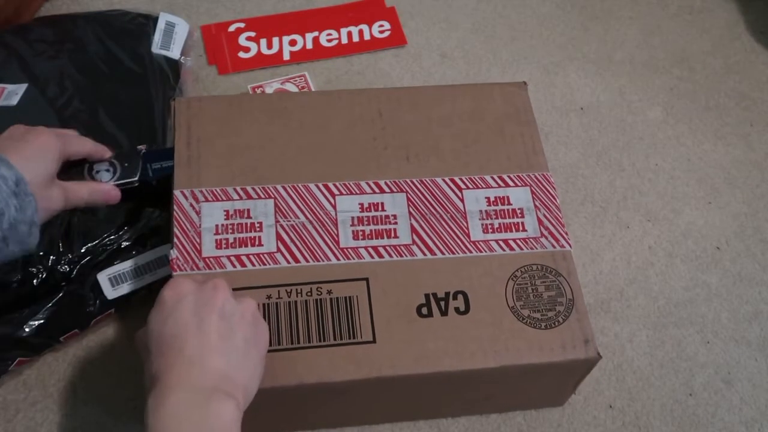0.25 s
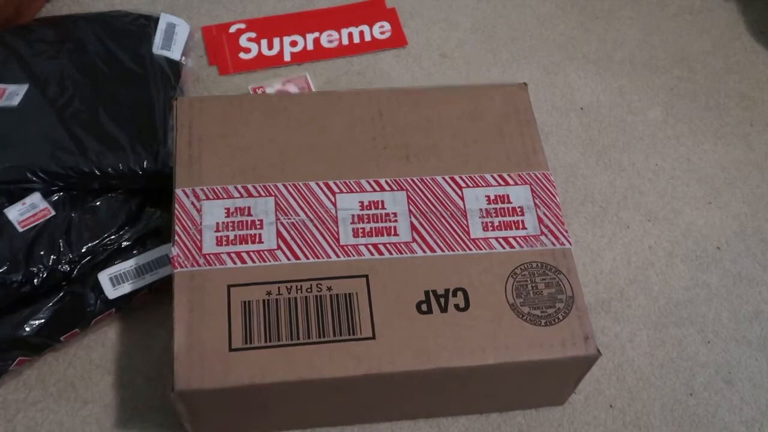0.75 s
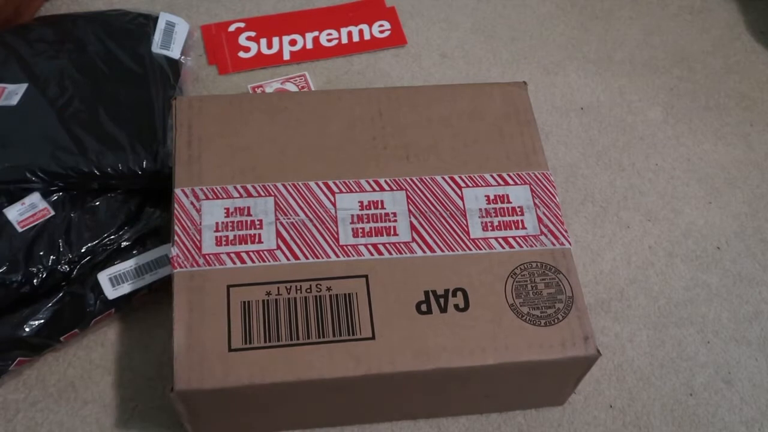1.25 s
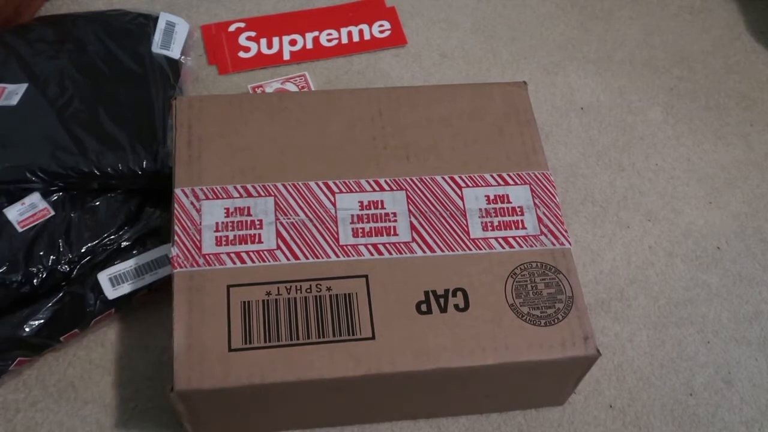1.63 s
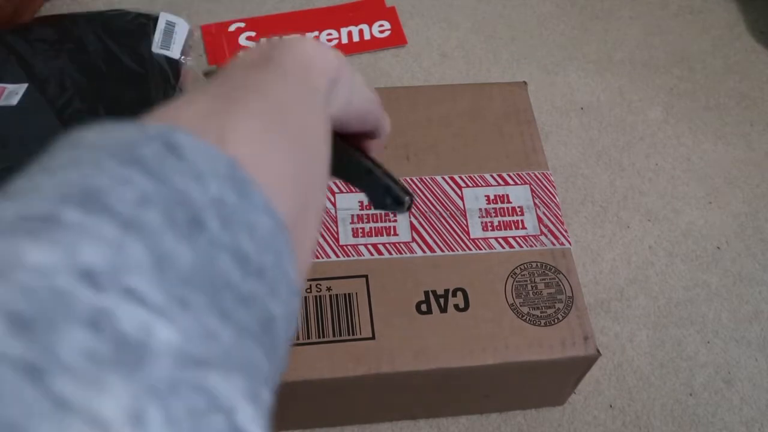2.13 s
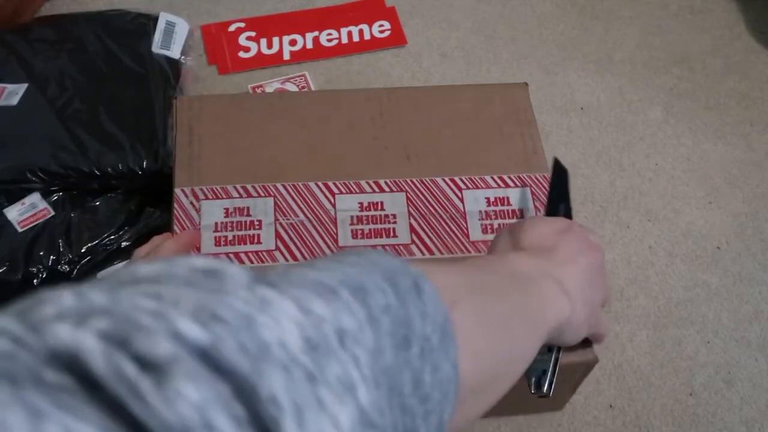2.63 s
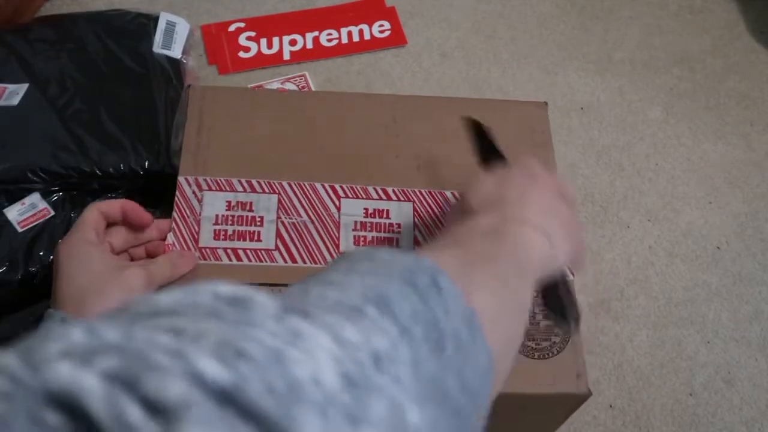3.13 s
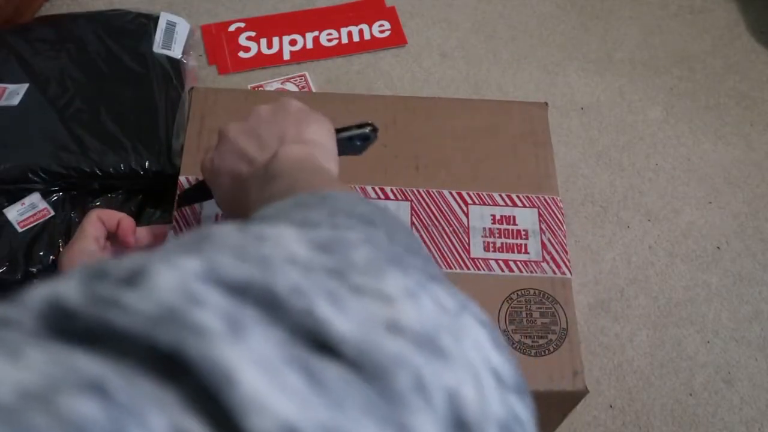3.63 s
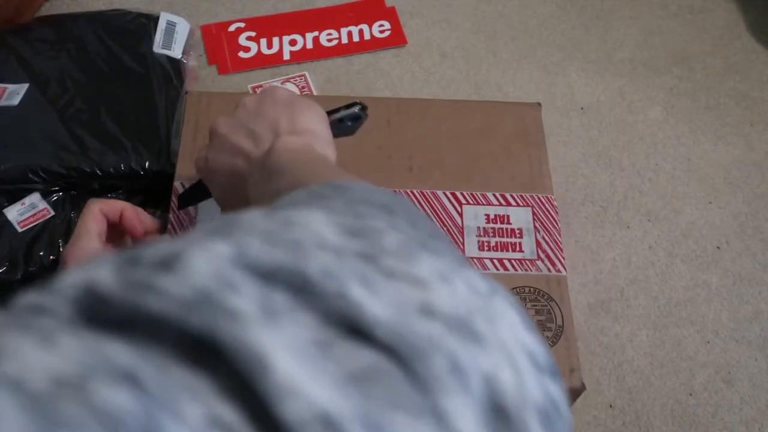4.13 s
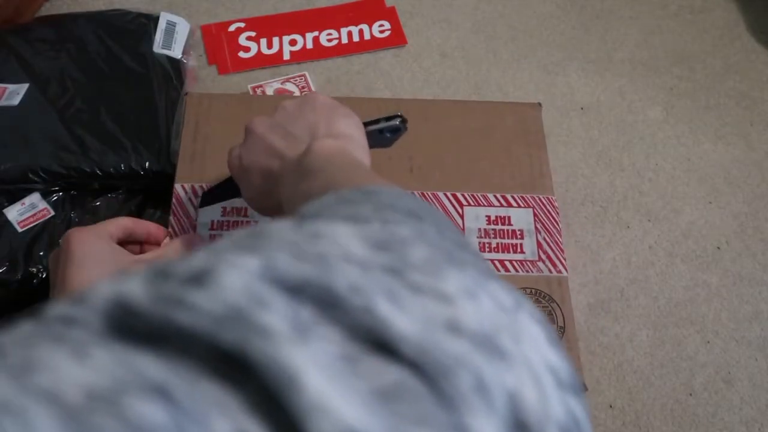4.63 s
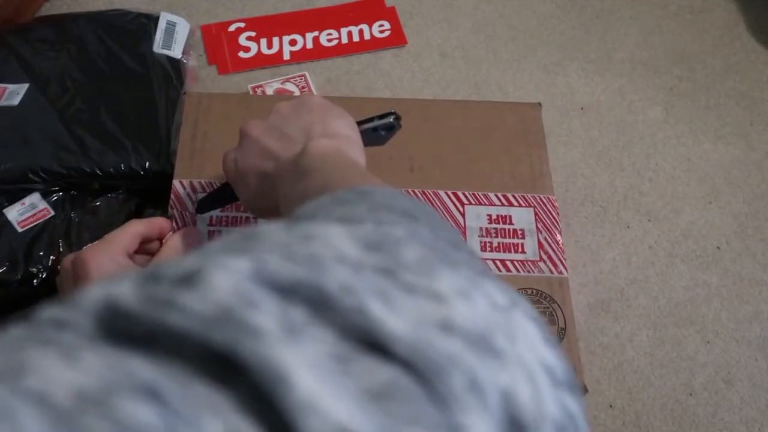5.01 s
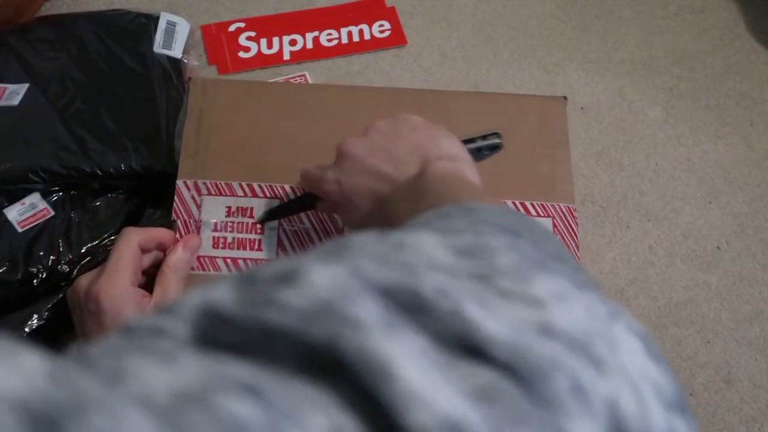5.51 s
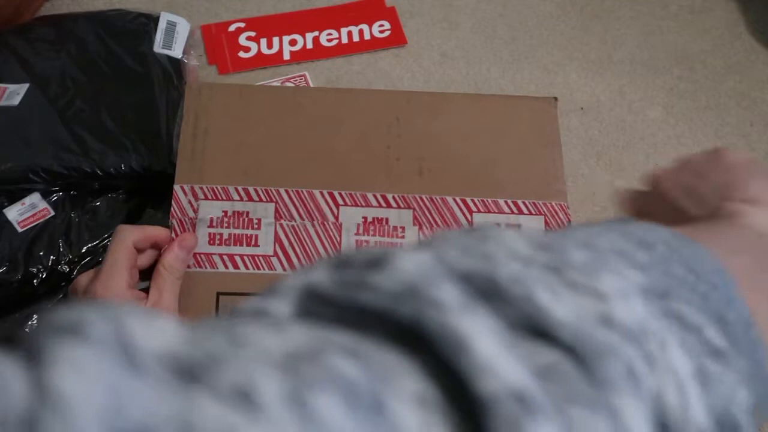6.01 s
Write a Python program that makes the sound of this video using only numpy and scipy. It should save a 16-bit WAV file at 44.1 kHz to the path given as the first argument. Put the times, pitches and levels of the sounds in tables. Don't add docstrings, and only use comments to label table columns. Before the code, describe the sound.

A dry scrape and a faint steely slide open the scene at a taped cardboard box, ending in a hollow knock. A quiet second holds only rumble, hiss and a tiny lock tick. Cloth brushes past, the blade rubs and taps, then stabs with loud boxy knocks. Small rasps follow before a long crackling cut with a sharp final clack. Close stereo microphones, small carpeted room.

```python
import sys
import numpy as np
from scipy import signal
from scipy.fft import rfft, irfft, next_fast_len
from scipy.io import wavfile
from scipy.ndimage import uniform_filter1d, map_coordinates

SR = 44100
rng = np.random.default_rng(int(sys.argv[2]) if len(sys.argv) > 2 else 0)


def output_pcm(signal):
    pcm = np.clip(np.atleast_2d(signal).T, -1, 1) * 32767
    wavfile.write(sys.argv[1], SR, np.round(pcm).astype(np.int16))


def decibels_to_gain(level_db):
    exponent = np.asarray(level_db, float) / 20
    return 10 ** exponent


N = 275933


def unit(x):
    return x / np.sqrt(np.mean(x ** 2) + 1e-20)


def noise():
    return rng.standard_normal(N)


def along(points, hz):
    f, v = np.transpose(points)
    return np.interp(np.log(hz + 1), np.log(f + 1), v)


def wobble(rate):
    knots = rng.standard_normal(int(N * rate / SR) + 4)
    return map_coordinates(knots, [np.arange(N) * rate / SR])


def held(rows, attack_s, release_s):
    edge_db = 18.5
    t, power = np.arange(N) / SR, 0
    for start, hold, *db in rows:
        knots = np.cumsum([start - 3 * attack_s, 3 * attack_s, abs(hold), 3 * release_s])
        shape = decibels_to_gain(2 * np.interp(t, knots, [-3 * edge_db, 0, 0, -3 * edge_db], -99, -99))
        power = power + decibels_to_gain(2 * np.array(db))[:, None] * shape
    return np.sqrt(power)


def filtered(x, response):
    m = next_fast_len(N + SR // 2)
    return irfft(rfft(x, m) * response(np.fft.rfftfreq(m, 1 / SR)), m)[..., :N]


def colour(table):
    return lambda f: decibels_to_gain(along(table, f))


def modes(table):
    def response(f):
        total = 0
        for k, (centre, width, db) in enumerate(table):
            damping = 1j * f * width
            total = total + (-1) ** k * decibels_to_gain(db) * damping / (centre * centre - f * f + damping)
        return total
    return response


def body(table, top_hz):
    return lambda f: modes(table)(f) / (1 + 1j * f / top_hz) ** 2


def grit(rate, spread_db, share):
    slips = rng.random(N) < rate / SR
    push = np.clip(noise(), -2, 2)
    size = decibels_to_gain(spread_db * np.clip(noise(), -3, 1.5))
    return np.sqrt(1 - share) * unit(slips * push * size) + np.sqrt(share) * noise()


def random_patches(shape, frames):
    field = uniform_filter1d(rng.standard_normal(shape), size=3, axis=0)
    return unit(uniform_filter1d(field, size=frames, axis=1))


def patchy(x, depth_db):
    z = signal.stft(x, nperseg=256)[2]
    return signal.istft(z * decibels_to_gain(depth_db * random_patches(z.shape, 7)), nperseg=256)[1][:N]


def shifting(x):
    z = signal.stft(x, nperseg=128)[2]
    return signal.istft(z * random_patches(z.shape, 5), nperseg=128)[1][:N]


# (time [s], level [dB])
RUMBLE_LEVEL = [(0.0, -50.5), (0.5, -47.5), (1.34, -49.5), (1.95, -46.5), (2.42, -41), (2.79, -44.5),
                (3.05, -39), (4.02, -42), (4.3, -44.5), (5.56, -45.5), (5.82, -36.5), (5.92, -37),
                (6.1, -46), (6.26, -51)]
# (frequency [Hz], level per Hz [dB])
RUMBLE = [(12, -60), (45, -29.5), (80, 3.5), (113, 0.5), (180, -16), (221, -17.5), (262, -49), (300, -39),
          (390, -55), (660, -120)]


def floor_rumble():
    time, db = np.transpose(RUMBLE_LEVEL)
    level = decibels_to_gain(np.interp(np.arange(N) / SR, time, db, -140, -140))
    lumps = decibels_to_gain(2.6 * wobble(14) + 2.6 * wobble(46))
    rumble = level * decibels_to_gain(1.0) * unit(lumps * filtered(noise(), colour(RUMBLE)))
    building = decibels_to_gain(-54.5) * unit(filtered(noise(), body([(49.4, 24, 0)], 110)))
    low = rumble + building
    stray = decibels_to_gain(-39) * np.roll(low, SR // 7) * [[1], [-1]]
    return low + stray


# (start [s], hold [s], level [dB])
HUM_LEVEL = [
    (.95, 0.85, -62.5),
    (2.5, 0.36, -56.5),
]
# (frequency [Hz], width [Hz], level [dB])
HUM = [(338, 5.3, 0)]


def far_hum():
    return held(HUM_LEVEL, 0.076, 0.4)[0] * decibels_to_gain(-0.5) * unit(filtered(noise(), modes(HUM)))


# (frequency [Hz], level per Hz [dB])
HISS = [(71, -76), (120, -9), (133, -1), (236, -4.5), (341, 1.5), (370, -4), (656, -9), (856, -10),
        (930, -10.5), (2380, -16), (7350, -26.5), (13100, -32.5), (13250, -50)]
# (frequency [Hz], correlation [-1 to 1])
ALIKE = [(60, 0.82), (180, 0.74), (550, -0.067), (1650, -0.26), (4970, -0.14), (15000, -0.33)]


def microphone_hiss():
    def spread(hz):
        angle = np.arccos(np.clip(along(ALIKE, hz), -1, 1)) / 2
        return colour(HISS)(hz) * [np.cos(angle), np.sin(angle)]
    mid, side = filtered(rng.standard_normal((2, N)), spread)
    return decibels_to_gain(-55) * np.array([mid + side, mid - side]) / np.std(mid)


def electronic_whine():
    whine_hz, beat_hz, whine_db = 13017, 23.976, -79
    t = np.arange(N) / SR
    pulse = 1 + 0.4 * np.cos(2 * np.pi * beat_hz * (t - .995))
    return decibels_to_gain(whine_db + 1.5 * wobble(8)) * pulse * np.sin(2 * np.pi * whine_hz * t)


# (frequency [Hz], 60 dB decay [s])
ROOM = [(150, 0.13), (1000, 0.12), (4000, 0.16), (12000, 0.17), (14500, .06)]


def echo(x, stretch):
    hz, t, z = signal.stft(rng.standard_normal(SR // 2), SR, nperseg=128)
    decay = decibels_to_gain(-60 * t / (stretch * along(ROOM, hz)[:, None]))
    tail = signal.istft(z * decay, SR, nperseg=128)[1]
    return signal.fftconvolve(x, tail / np.linalg.norm(tail))[:N]


# (start [s], hold [s], level [dB])
SLEEVE = [
    (1.95, 0.09, -62),
    (2.122, 0.013, -60.5),
]
# (frequency [Hz], width [Hz], level [dB])
WEAVE = [(1380, 140, 7), (1590, 260, 2), (1010, 300, 1)]


def sleeve():
    rub = patchy(filtered(noise(), modes(WEAVE)), depth_db=1.5)
    return held(SLEEVE, 0.089, 0.042)[0] * decibels_to_gain(5.0) * unit(decibels_to_gain(2.5 * wobble(39.4)) * rub)


# (start [s], hold [s], level [dB])
CUFF = [
    (3.2, 0.16, -59.5),
    (4.7, 0.067, -67),
    (5.09, 0.033, -67),
]
# (frequency [Hz], width [Hz], level [dB])
NAP = [(2230, 400, 7), (1000, 610, 6)]


def cuff():
    drag = filtered(grit(680, 1.4, 0.45), body(NAP, 5000))
    return held(CUFF, 0.038, 0.043)[0] * unit(patchy(drag, depth_db=2.5))


# (time [s], first pitch [Hz], last pitch [Hz], length [s], level [dB])
CHIRP = (1.588, 2500, 1400, .013, -44)


def lock_tick():
    start, high_hz, low_hz, length, db = CHIRP
    progress = np.clip((np.arange(N) / SR - start) / length, 0, 1)
    pitch = high_hz * (low_hz / high_hz) ** progress
    return decibels_to_gain(db) * np.sin(np.pi * progress ** .6) * np.sin(2 * np.pi * np.cumsum(pitch) / SR)


def damped_tones(rows):
    out, t = np.zeros(N + SR), np.arange(SR // 8) / SR
    for s, hz, db, t60 in rows:
        drift = 0.035 * (hz / 1000) * np.cumsum(rng.standard_normal(len(t)))
        swell = 1 - np.exp(-t * hz / 0.62)
        tone = np.sin(2 * np.pi * hz * t + drift)
        out[round(s * SR):][:len(t)] += decibels_to_gain(db - 60 * t / t60) * swell * tone
    return out[:N]


# (time [s], pitch [Hz], level [dB], 60 dB decay [s])
BOOMS = [(0.7875, 138, -13.5, 0.077), (2.299, 193, -30, 0.067), (3.929, 151, -7.5, 0.085),
         (4.0008, 167, -9, 0.048), (4.042, 150, -14, 0.063), (5.542, 174, -26.5, 0.06),
         (5.584, 145, -28, 0.052), (5.621, 160, -35, .06), (5.665, 163, -10.5, 0.16),
         (5.707, 175, -21, 0.056), (5.791, 160, -36, 0.048), (5.886, 164, -14, 0.092),
         (5.944, 174, -19, 0.074), (5.996, 170, -17, 0.061), (5.296, 165, -24.5, 0.063),
         (5.365, 164, -25.5, 0.068), (4.806, 120, -38, .07), (4.98, 151, -34, 0.11)]


def booms():
    return damped_tones(BOOMS)


# (time [s], pitch [Hz], level [dB], 60 dB decay [s])
RINGS = [(.517, 490, -37.5, .05), (0.572, 1300, -32, 0.041), (.576, 503, -29.5, 0.062),
         (.77, 501, -21, .05), (.777, 587, -19, 0.035), (.779, 888, -22, 0.045), (.778, 1630, -26, 0.022),
         (.778, 2040, -27, 0.032), (.778, 2300, -33, .03), (1.59, 2440, -55, 0.12), (1.594, 900, -48, 0.02),
         (.781, 366, -25, .045), (.779, 3505, -42, .05), (2.3, 3200, -42, .03), (2.299, 1700, -38, .03),
         (5.612, 1100, -30, .04), (5.763, 2620, -35, .09), (2.3, 710, -25, 0.029),
         (2.891, 1250, -23.5, 0.019), (3.068, 3770, -35.5, .025), (3.083, 502, -19, 0.06),
         (3.606, 510, -24.5, 0.021), (3.738, 840, -42, 0.035), (3.929, 1145, -20, 0.071),
         (3.9283, 546, -10.5, 0.066), (3.984, 658, -16, 0.034), (3.989, 710, -10.5, 0.019),
         (3.994, 890, -22, 0.038), (4.038, 2030, -15, 0.013), (4.039, 558, -0.5, 0.02),
         (4.064, 520, -16, 0.05), (4.151, 6000, -42, .03), (4.29, 885, -42.5, 0.057),
         (4.381, 260, -7.5, 0.015), (4.366, 1000, -41, .02), (4.381, 940, -26, 0.025),
         (4.385, 1300, -40, .025), (4.577, 1050, -25, 0.028), (4.589, 1460, -33.5, .04),
         (2.968, 900, -35, 0.018), (5.581, 610, -27, .025), (5.669, 1400, -28, 0.048),
         (5.837, 570, -33, 0.032), (6.0, 495, -29, 0.071), (5.968, 500, -24, .06),
         (6.036, 520, -12.5, 0.048), (5.72, 490, -23.5, 0.075), (5.886, 480, -18.5, 0.035),
         (4.489, 517, -25, 0.061), (4.577, 498, -12.5, 0.05), (4.579, 543, -21, 0.05),
         (4.886, 910, -36.5, 0.02), (6.039, 2750, -10.5, 0.026), (6.06, 2280, -21, 0.034),
         (6.042, 4040, -17, 0.044)]


def rings():
    return damped_tones(RINGS)


# (time [s], level [dB], pitch [Hz])
TICKS = [(0.5562, -38, 7330), (0.5738, -19, 6450), (0.577, -30, 7340), (1.222, -41, 4280), (2.3, -27, 1620),
         (1.485, -31.5, 11000), (2.8898, -23, 4560), (2.8938, -18.5, 6300), (3.922, -30, 6000),
         (3.9268, -14, 4000), (3.927, -12, 10000), (3.931, -15, 6200), (3.9307, -16, 9800),
         (3.935, -12, 11500), (3.935, -6.5, 2800), (3.9378, -10, 5800), (3.939, -16, 13000),
         (4.0383, -11, 3740), (4.0388, -14, 12000), (4.0394, -11, 1300), (4.071, -23, 1200),
         (4.127, -29.5, 905), (.594, -32, 6800), (4.3949, -48, 3010), (4.4623, -39, 5100),
         (4.486, -29, 7000), (4.8653, -34.5, 6200), (5.3091, -23, 3000), (5.35, -22, 3040),
         (5.353, -17, 9000), (5.4535, -50, 4480), (5.5977, -36, 6540), (5.602, -25, 10600),
         (5.62, -17, 9500), (5.669, -22, 2200), (5.7037, -18, 3000), (5.7635, -22, 5820),
         (5.581, -26, 1800), (5.724, -32, 3000), (5.846, -26, 4500), (5.8863, -32, 1500),
         (5.8342, -12, 4040), (5.856, -19, 5210), (5.9771, -14.5, 3360), (6.0043, -21, 3990),
         (6.037, -8.5, 9000), (6.039, -17, 760), (6.066, -21, 700), (.7805, -18, 290), (4.052, -24, 3300),
         (4.066, -27, 2500), (5.684, -27, 1500), (5.797, -28, 950), (5.839, -22, 2400)]


def short_ticks():
    out, t = np.zeros(N + SR), np.arange(SR // 100) / SR
    for s, db, hz in TICKS:
        decay = decibels_to_gain(db + 4.0 - 60 * t * hz / 6)
        out[round(s * SR):][:len(t)] += decay * (1 - np.exp(-t * hz / 0.48)) * np.sin(2 * np.pi * hz * t)
    return out[:N]


# (frequency [Hz], width [Hz], level [dB])
DRUM = [(166.5, 60.5, -3.5), (105, 103, -7), (236, 214, -15)]


def cavity(top_hz):
    return lambda f: body(DRUM, top_hz)(f) * (1j * f / (70 + 1j * f)) ** 2


# (frequency [Hz], width [Hz], level [dB])
PANEL = [(388, 39, -0.5), (484, 62, 1), (584, 40, -1.5), (762, 167, -20.5), (850, 28, -34)]


def flap(f):
    return body(PANEL + [(600, 500, -14)], 1400)(f) * (1j * f / (330 + 1j * f)) ** 2


# (frequency [Hz], width [Hz], level [dB])
BOARD = [(1298, 266, 2.5), (1324, 650, -3.5), (2160, 435, -4), (2750, 200, -12), (3306, 150, -9),
         (4040, 1300, -17.5), (5300, 130, -41)]


def board(f):
    return body(BOARD + [(1800, 2500, -12)], 4500)(f)


def contacts(rows, rise, flap_db, snap_db):
    force, t = np.zeros((4, N + SR)), np.arange(SR // 6) / SR
    decay_share = np.array([[.4], [.8], [1.5], [1.6]])
    for s, db, weight_db, length in rows:
        panel_db = flap_db + 0.38 * weight_db
        length = np.clip(length, .002, .12)
        burst = rng.standard_normal((4, len(t)))
        jolts = rng.standard_normal(len(t) // 40 + 1).repeat(40)[:len(t)]
        burst[2:] *= decibels_to_gain(2.6 * jolts)
        burst[0] = np.cos(2 * np.pi * 150 * t)
        burst *= decibels_to_gain(-60 * t / (length * decay_share)) * (1 - np.exp(-t / (rise * length)))
        burst /= np.linalg.norm(burst, axis=1)[:, None]
        levels = db + np.array([[weight_db], [panel_db], [0], [snap_db]])
        force[:, round(s * SR):][:, :len(t)] += decibels_to_gain(levels) * burst
    air = decibels_to_gain(33.0) * filtered(force[0, :N], cavity(506))
    flaps = decibels_to_gain(49.5) * filtered(force[1, :N], flap)
    knock = decibels_to_gain(29.0) * filtered(force[2, :N], board)
    tape = body([(5020, 11500, 2.5), (9580, 15800, -4.0)], 16000)
    snap = decibels_to_gain(26.0) * filtered(force[3, :N], tape)
    return air + flaps + knock + snap


# (time [s], knock level [dB], weight [dB], contact time [s])
CATCHES = [(4.93, -46, -3, 0.037), (4.975, -49, 14.5, 0.019), (5.01, -55, 1, 0.018), (5.08, -47, 5, 0.016),
           (5.15, -47, 8, 0.022), (5.21, -53, 3, 0.015), (5.645, -41, 2, .015), (5.72, -37, 14, 0.023),
           (5.745, -50, -2, .015), (5.81, -38, -1, 0.016), (5.91, -40, 6, 0.017), (5.95, -39.5, 9, 0.018),
           (6.058, -19.5, -10.5, 0.025), (6.072, -22.5, -6, 0.023), (6.085, -30, -6, 0.011)]


def catches():
    return contacts(CATCHES, rise=0.098, flap_db=0, snap_db=-12)


# (time [s], knock level [dB], weight [dB], contact time [s])
SCUFFS = [(.1054, -33, -38, 0.022), (.7672, -25, -4, 0.02), (2.2746, -42, 1, 0.045),
          (2.593, -48, 15, 0.026), (2.6299, -54, 21, 0.022), (2.8839, -23, -7.5, 0.058),
          (2.9641, -42, 7, 0.021), (3.0907, -27, -6, 0.029), (3.9888, -16.5, -12, 0.028),
          (4.0607, -31, 1, 0.046), (4.1137, -37, -8, 0.0082), (4.1444, -30.5, -8, 0.051),
          (5.0514, -49, 8, 0.047), (5.3293, -35, 8.5, 0.15), (5.3738, -53.5, 12, 0.04),
          (5.5425, -40.5, 9, .071), (5.5813, -36, 12, 0.05), (5.6178, -29.5, 3.5, 0.015),
          (5.7299, -42, 22, 0.064), (5.918, -32, 6.5, 0.04)]


def scuffs():
    return contacts(SCUFFS, rise=0.27, flap_db=-3.5, snap_db=-20.5)


# (time [s], knock level [dB], weight [dB], contact time [s])
KNOCKS = [(.7775, -21, -5, 0.011), (.7855, -31, 20, 0.0048), (2.2985, -37.5, 14.5, 0.038),
          (2.7557, -26, -32, 0.049), (3.6054, -48, 20, 0.041), (4.002, -31, 18, 0.0053),
          (4.0386, -8, -1, 0.019), (4.3815, -50, 35, .012), (4.575, -22, -4, 0.019),
          (4.8854, -50, 14, 0.015), (5.666, -18.5, -1.5, 0.066), (6.0385, -4, -21.5, 0.057)]


def knocks():
    return contacts(KNOCKS, rise=0.034, flap_db=-7, snap_db=-18)


# (time [s], knock level [dB], weight [dB], contact time [s])
RASPS = [(.512, -33.5, -15, 0.075), (.5854, -44, -10, 0.0079), (2.4539, -44, -7, 0.037),
         (2.8443, -40.5, 1, 0.14), (3.075, -28, -7.5, 0.066), (4.1774, -46, 16.5, 0.012),
         (4.2894, -48, 8.5, 0.031), (4.5288, -38, 0, 0.12), (4.7841, -44.5, -10, 0.017),
         (5.1176, -48.5, 4, 0.044), (5.4488, -44.5, -33, 0.036), (5.7888, -33, 15.5, .031),
         (6.0023, -24.5, -9, 0.049), (6.0194, -15, -19, 0.067), (6.0398, -32, -13, 0.062),
         (3.822, -46, -25, .04)]


def rasps():
    return contacts(RASPS, rise=0.42, flap_db=-0.58, snap_db=-6)


# (time [s], knock level [dB], weight [dB], contact time [s])
STABS = [(.5696, -34, 0.5, 0.018), (1.481, -46, -2, 0.11), (3.9265, -18.5, 2, 0.012),
         (3.9352, -16, -7, 0.11), (4.4869, -39, 7, 0.011), (5.3083, -28, -8, 0.018),
         (5.3497, -29.5, -7, 0.092), (5.5977, -27.5, -25, 0.051), (5.7044, -35, 15, 0.044),
         (5.7643, -31.5, -12, 0.089), (5.834, -20.5, -22, 0.036), (5.8557, -33, -25, 0.043),
         (5.886, -36.5, 22, 0.049), (5.9753, -27, -5, 0.042)]


def stabs():
    return contacts(STABS, rise=0.0052, flap_db=-2.3, snap_db=-4.5)


# (start [s], hold [s], level [dB])
SLIDE = [
    (.055, 0.043, -49),
    (.29, 0.07, -45),
    (.37, 0.078, -42),
]
# (frequency [Hz], width [Hz], level [dB])
STEEL = [(2100, 1800, -1), (4000, 2100, -0.5), (6600, 600, 8.5), (7550, 550, 8), (9000, 1300, 3),
         (12500, 7900, -4.5)]


def blade_whistle():
    steel = patchy(filtered(noise(), modes(STEEL)), depth_db=2.0)
    return held(SLIDE, 0.04, 0.028)[0] * decibels_to_gain(-5.0) * unit(steel)


# (start [s], hold [s], pressure [dB], edge bite over it [dB])
STROKES = [(0.0, .1, -45, 0), (0.187, 0.073, -48, -12), (0.301, 0.16, -41.5, -1.5),
           (0.547, 0.038, -43.5, -4.5), (2.003, 0.47, -51.5, -14.5), (2.414, 0.074, -45.5, -10),
           (2.608, 0.19, -47.5, -2.5), (2.863, 0.3, -44.5, -6), (3.185, 0.12, -48.5, -13.5),
           (3.45, 0.048, -51, -10), (3.626, 0.15, -51, -11), (3.978, 0.1, -43.5, 3), (4.058, 0.022, -50, 4),
           (4.106, 0.076, -46, 0), (4.389, 0.0091, -37.5, -18), (4.557, 0.14, -45.5, -9.5),
           (4.755, 0.38, -45, -12), (5.01, 0.11, -36.5, -23.5), (5.164, 0.1, -43, -12),
           (5.306, 0.025, -32.5, -12.5), (5.41, 0.15, -52, -8)]
# (start [s], hold [s], pressure [dB], edge bite over it [dB])
CUTS = [
    (5.59, 0.038, -33.5, -4),
    (5.692, 0.014, -31, -2.5),
    (5.728, 0.068, -35, -6),
    (5.892, 0.037, -36, -9),
    (5.979, 0.039, -27.5, -11.5),
    (6.013, 0.056, -28.5, -2.5),
    (6.12, 0.043, -51, -1),
]
# (frequency [Hz], level per Hz [dB])
TAPE = [(1760, -24), (3000, 1), (3970, -8.5), (4500, -5.5), (4930, -5.5), (11800, -12.5), (13700, -20),
        (16000, -32)]


def strokes():
    rows = []
    for start, hold, db, bite_db in STROKES:
        panel_db = db - 10 + 0.17 * (db + 37.0)
        rows.append((start, hold, db, panel_db, db + bite_db))
    for start, hold, db, bite_db in CUTS:
        rows.append((start, hold, db, db - 6, db + bite_db))
    drum, panel, scrape = held(rows, attack_s=0.075, release_s=0.049)
    jerk = decibels_to_gain(1.5 * wobble(35))
    air = drum * decibels_to_gain(-1.5) * unit(jerk * filtered(grit(150, 4.3, 0.39), cavity(680)))
    rub = patchy(filtered(grit(300, 2.2, 0.68), flap), depth_db=5.0)
    flaps = panel * decibels_to_gain(0.5) * unit(jerk * rub)
    jerk = jerk * decibels_to_gain(0.65 * wobble(120))
    tear = patchy(filtered(grit(1500, 4.4, 0.5), board), depth_db=3)
    cut = scrape * decibels_to_gain(-6.5) * unit(jerk * tear)
    fizz = patchy(filtered(grit(1100, 0.74, 0.74), colour(TAPE)), depth_db=3)
    tape = scrape * decibels_to_gain(-10) * unit(jerk * fizz)
    return air + flaps + cut + tape


# (frequency [Hz], side level over mid [dB])
WIDTH = [(100, -33), (200, -28), (350, -24), (1000, -31), (2500, -21), (5000, -8.5), (9000, -2.5),
         (14000, 4.5)]


def scene():
    background = floor_rumble() + far_hum() + microphone_hiss() + electronic_whine()
    touches = catches() + scuffs() + knocks() + rasps() + stabs()
    box = sleeve() + cuff() + lock_tick() + booms() + rings() + short_ticks()
    box = box + touches + blade_whistle() + strokes()
    room = echo(np.pad(box, (200, 0))[:N], 0.9)
    mid = box + decibels_to_gain(-7.5) * filtered(room, lambda f: 1j * f / (450 + 1j * f))
    side = filtered(shifting(echo(box, 0.12)) + decibels_to_gain(-4) * echo(box, 1.2), colour(WIDTH))
    return np.array([mid + side, mid - side]) + background


def low_pass(x):
    return signal.sosfilt(signal.butter(12, 16470, fs=SR, output="sos"), x)


def record(dry):
    falloff = [(13000, 0.5), (14000, -5), (15300, -6), (16200, -14), (16500, -67)]  # (Hz, dB)
    mix = filtered(dry, colour(falloff))
    return low_pass(mix)


dry = scene()
out = record(dry)
output_pcm(out)
```